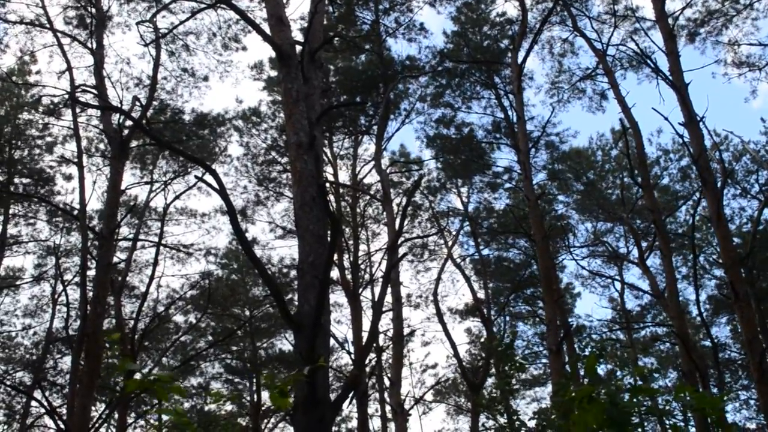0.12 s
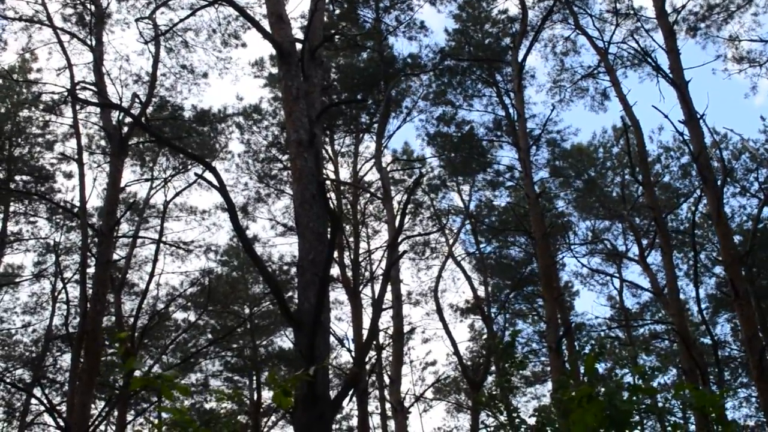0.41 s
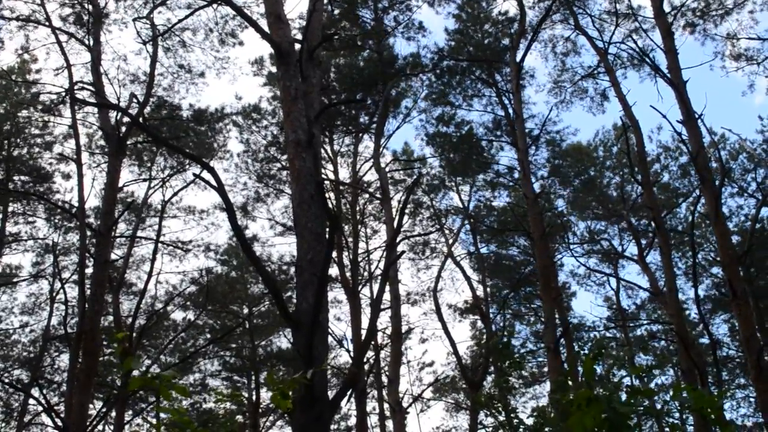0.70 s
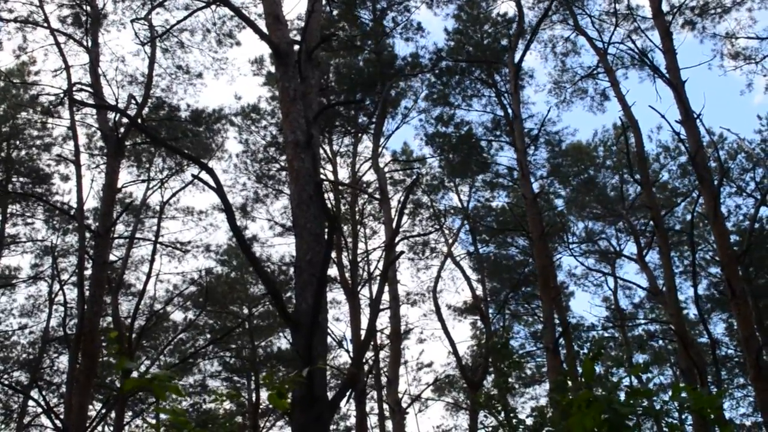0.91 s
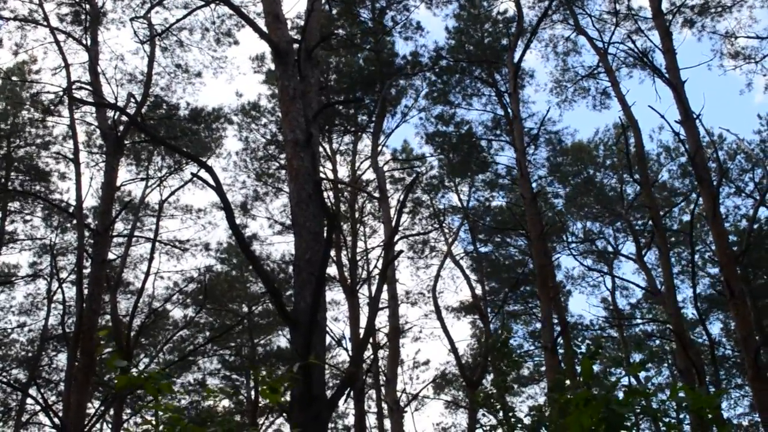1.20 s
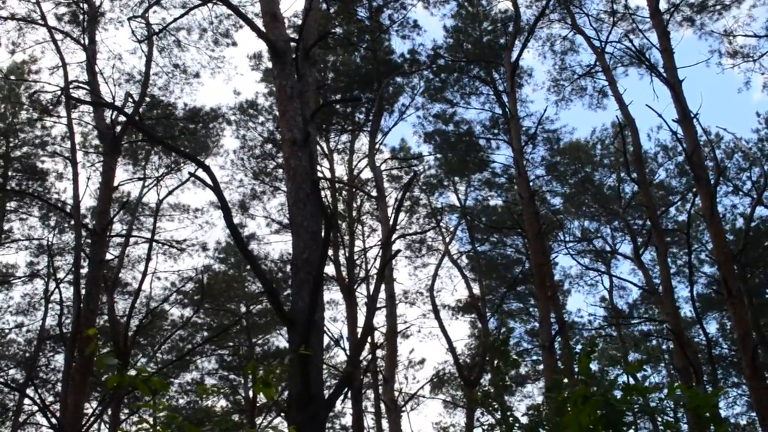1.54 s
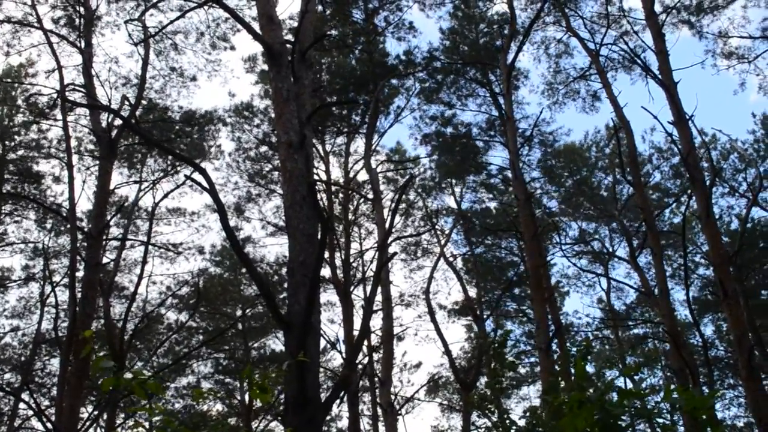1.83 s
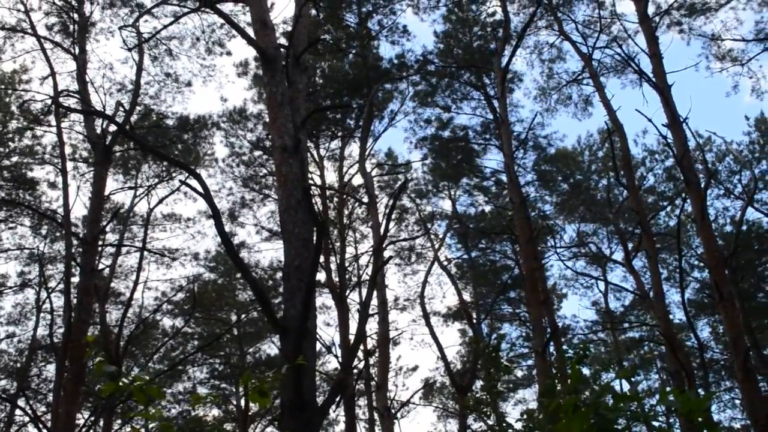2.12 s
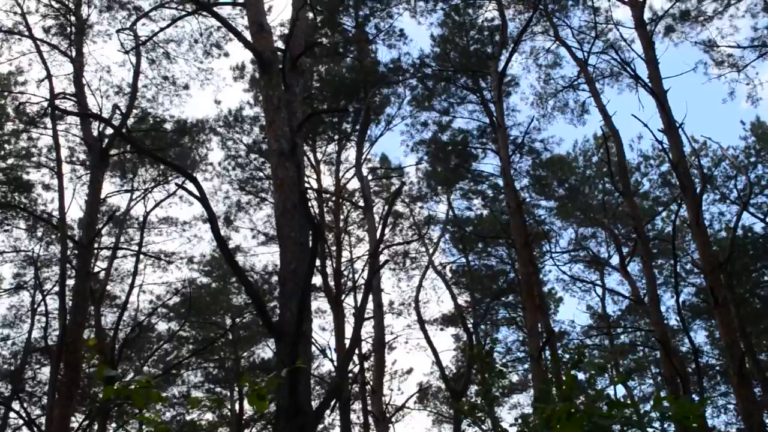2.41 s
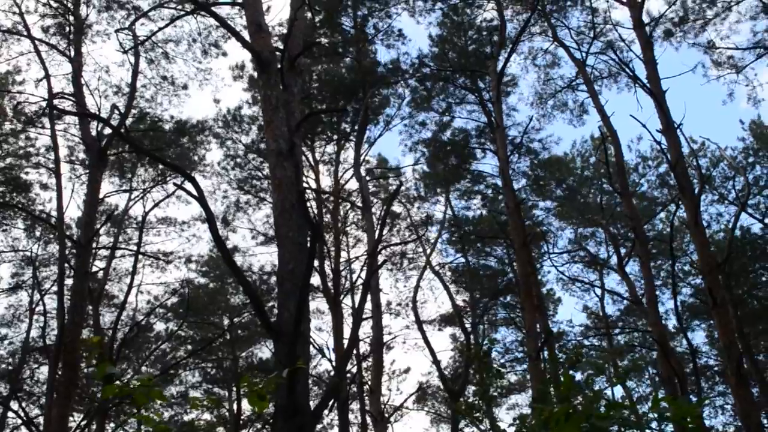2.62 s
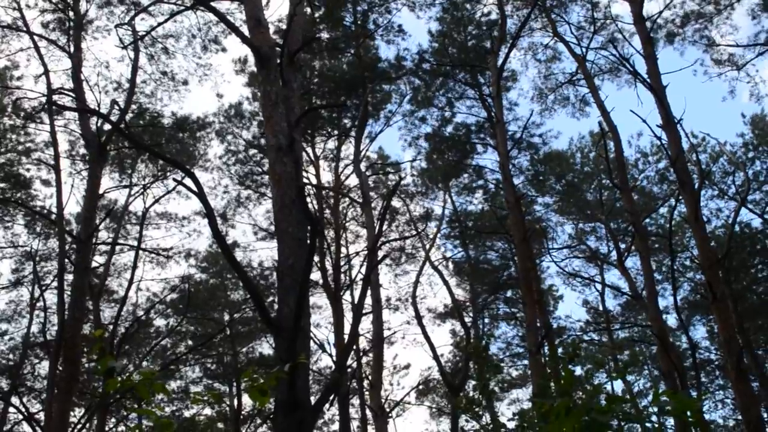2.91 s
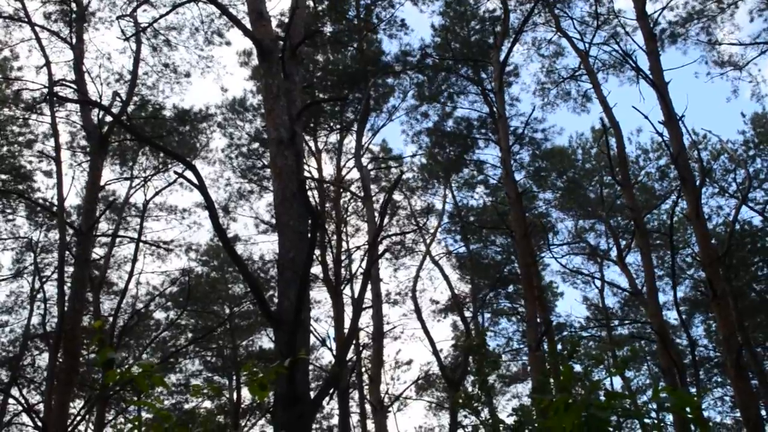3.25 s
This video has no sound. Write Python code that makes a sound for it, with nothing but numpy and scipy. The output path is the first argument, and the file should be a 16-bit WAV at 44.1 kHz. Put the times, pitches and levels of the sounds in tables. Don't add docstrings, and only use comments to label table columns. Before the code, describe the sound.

A small warbler sings close by in a pine forest. From 0.2 s, separate piercing upward whistles grow louder and closer together, becoming a fast, even trill from 1.7 to 3.1 s. A very distant thrush glides faintly until 1.5 s; a nearer one flutes softly from 2.4 s to the end. A woody twig tick at 1.8 s, a tiny leaf tick at 1.9 s. Soft air hum, early faint leaf hiss, short woodland haze.

```python
import sys
import numpy as np
from scipy import signal
from scipy.fft import rfft, irfft
from scipy.io import wavfile
from scipy.ndimage import uniform_filter1d

SR = 44100
rng = np.random.default_rng(int(sys.argv[2]) if len(sys.argv) > 2 else 0)


def put_to_file(sound):
    columns = np.atleast_2d(sound).T
    safe = np.clip(columns, -1, 1)
    whole_steps = np.round(safe * 32767)
    wavfile.write(sys.argv[1], SR, whole_steps.astype(np.int16))


def invert_db(x):
    u = np.asarray(x, float) / 20
    return 10 ** u


N = 149940

# (time of passing the anchor pitch [s], level [dB], top pitch [Hz])
OPENING_NOTES = [(0.1834, -34.5, 9060), (0.3755, -35, 8580), (0.5366, -32, 8320), (0.6912, -28, 7930),
                 (0.8409, -27, 7860), (0.9846, -27.5, 7850), (1.1263, -27, 7740), (1.2585, -26.5, 7730),
                 (1.3897, -24.5, 7760), (1.5239, -23, 7590), (1.6376, -25, 7530)]
# (time of passing the anchor pitch [s], level [dB], top pitch [Hz])
TRILL_NOTES = [(1.7149, -25, 7430), (1.7778, -24.8, 7460), (1.8381, -25.5, 7470), (1.899, -25, 7260),
               (1.9604, -24.5, 7230), (2.0212, -24.5, 7380), (2.0831, -24.5, 7470), (2.1434, -24.5, 7530),
               (2.2056, -25, 7440), (2.2677, -25, 7230), (2.3289, -26, 7210), (2.3907, -26, 7190),
               (2.4540, -24, 7280), (2.5181, -24.5, 7160), (2.5776, -24, 7270), (2.6404, -25, 7280),
               (2.7037, -25, 7350), (2.7669, -24.5, 7350), (2.8307, -24, 7350), (2.8947, -24.5, 7270),
               (2.9611, -26, 7160), (3.0261, -26.5, 7000), (3.0896, -26, 7130)]
ANCHOR_HZ = 5500

# (time from the anchor [s], pitch [Hz], level [dB], octave overtone level [dB])
FIRST_SHAPE = [(-.010, 2800, -33, -36), (-.006, 3250, -21, -25), (-.003, 4000, -17, -25),
               (0, 5500, -17, -28), (.007, 7200, -8, -60), (.017, 8100, -1, -70), (.030, 9050, -1, -70),
               (.036, 8800, -14, -70)]
LAST_SLOW_SHAPE = [(-.021, 1950, -45, -26), (-.011, 2850, -24, -18), (-.004, 4400, -14, -25),
                   (0, 5500, -9, -27), (.007, 6650, -4, -60), (.017, 7030, 0, -70), (.028, 7650, -5, -70),
                   (.039, 6900, -20, -70)]
BRIDGE_SHAPE = [(-.019, 1950, -45, -28), (-.011, 2700, -26, -19), (-.004, 4300, -15, -25),
                (0, 5500, -6, -27), (.005, 6250, -4, -60), (.012, 6900, 0, -70), (.021, 7500, -2, -70),
                (.032, 6300, -13, -70)]
TURNING_SHAPE = [(-.014, 3400, -34, -40), (-.009, 3800, -22, -32), (-.003, 4600, -13, -29),
                 (0, 5500, -8, -31), (.004, 6250, -4, -60), (.010, 6950, 0, -70), (.017, 7400, -1, -70),
                 (.024, 6700, -11, -70)]
EARLY_TRILL_SHAPE = [(-.012, 3700, -28, -52), (-.008, 4150, -16, -33), (-.004, 4850, -5, -32),
                     (0, 5500, -2, -40), (.006, 6350, -2, -60), (.011, 6950, 0, -70),
                     (.0165, 7400, -1, -70), (.026, 6500, -11, -70)]
LAST_SHAPE = [(-.019, 3650, -24, -50), (-.013, 4000, -14, -34), (-.0055, 4500, -7, -32), (0, 5500, 1, -38),
              (.005, 6150, -2, -60), (.010, 6750, -1, -70), (.0145, 7100, -3, -70), (.023, 6200, -14, -70)]
SHAPE_TIMES = [.18, 1.1, 1.638, 1.715, 1.8, 2.7]

# (time [s], pitch [Hz], level [dB])
THRUSH_NOTES = [
    [(2.435, 1600, -68), (2.456, 1800, -62), (2.468, 1930, -54), (2.482, 1975, -50), (2.497, 1980, -53),
     (2.512, 1980, -60)],
    [(2.515, 2450, -64), (2.528, 2640, -57), (2.545, 2640, -60), (2.59, 2630, -64)],
    [(2.538, 2590, -62), (2.552, 2530, -58), (2.572, 2480, -60)],
    [(2.786, 2420, -58), (2.797, 2300, -53), (2.812, 2080, -60)],
    [(2.825, 1520, -58), (2.834, 1660, -55), (2.847, 1820, -57), (2.885, 1865, -52), (2.915, 1930, -44),
     (2.955, 1945, -42), (2.973, 2010, -47)],
    [(3.158, 2640, -60), (3.175, 2580, -53), (3.195, 2490, -49), (3.215, 2450, -53), (3.24, 2410, -49),
     (3.258, 2370, -51), (3.275, 2330, -43), (3.31, 2280, -46), (3.345, 2280, -48), (3.365, 2290, -55)],
    [(3.364, 2850, -66), (3.376, 2380, -60), (3.392, 2010, -50), (3.405, 1880, -50)],
]
# (time [s], pitch [Hz], level [dB])
THRUSH_WARBLE = [
    (2.556, 2300, -60),
    (2.568, 2080, -55),
    (2.61, 2080, -55),
    (2.65, 2100, -52),
    (2.68, 2080, -53),
    (2.70, 2050, -66),
]
# (time [s], length [s], start pitch [Hz], end pitch [Hz], level [dB])
FAR_GLIDES = [(.15, .05, 2100, 2030, -70), (.41, .09, 2090, 2090, -72), (.50, .07, 2270, 2290, -74),
              (.60, .07, 2290, 2300, -73), (.66, .05, 2100, 2110, -69), (.70, .13, 2300, 2220, -74),
              (.66, .12, 2670, 2670, -74), (.835, .10, 1800, 1810, -67), (.90, .08, 2050, 2000, -74),
              (1.04, .1, 2090, 2030, -73), (1.27, .07, 2400, 2500, -68), (1.335, .11, 2510, 2490, -66),
              (1.41, .04, 2080, 2040, -69), (1.44, .08, 2450, 2130, -70)]

# (pitch [Hz], level [dB], time to fall by 60 dB [s])
TWIG_TONES = [
    (1350, 0, .018),
    (900, -8, .008),
    (2000, -4, .008),
    (2600, -5, .007),
    (3200, -3, .008),
]
# (time [s], pitch [Hz], level [dB], length [s])
LEAF_TICK = (1.9352, 9900, -51, .0005)
# (frequency [Hz], level [dB])
AIR_COLOUR = [(20, -21), (200, -9), (500, 1), (1000, -0.5), (2000, -9.5), (4000, -16.5), (6500, -26),
              (9500, -30.5)]


def add(out, start, x):
    out[start:start + len(x)] += x[:len(out) - start]


def soft_filter(x, order, hz, kind="low"):
    return signal.sosfilt(signal.butter(order, hz, kind, fs=SR, output="sos"), x)


def drift(length, step_s, smooth):
    knots = rng.standard_normal(1000)
    steps = np.arange(length) / SR / step_s
    return uniform_filter1d(np.interp(steps, np.arange(1000), knots), size=smooth)


def whistle(rows, wobble_hz=0, dip_db=0):
    wobbles_per_s, slip = 52, 0.03
    s, *columns = np.transpose(rows)
    start = int(s[0] * SR)
    t = np.arange(start, int(s[-1] * SR)) / SR
    curves = [np.interp(t, s, column) for column in columns]
    hz, *levels = [uniform_filter1d(curve, size=60, mode="nearest") for curve in curves]

    wobble_phase = 2 * np.pi * wobbles_per_s * (t - t[0])
    if wobble_hz:
        wobble_phase = wobble_phase + slip * np.cumsum(rng.standard_normal(len(t)))
    swing = np.cos(wobble_phase)
    phase = 2 * np.pi * np.cumsum(hz + wobble_hz * swing) / SR
    fade = np.minimum(1, np.minimum(t - t[0], t[-1] - t) / 0.0012)
    return start, phase, [fade * invert_db(level - dip_db * swing) for level in levels]


def forest(x, wet_db, slow=1, scatter=2.2, thin_hz=20):
    near_t60_s, far_t60_s, late_db = 0.24, 0.59, -6
    t = np.arange(SR) / SR
    echo_size = invert_db(scatter * np.minimum(rng.exponential(1, SR), 5))
    echoes = soft_filter(rng.standard_normal(SR) * echo_size, 1, 9000)
    echoes = soft_filter(echoes, 1, thin_hz, "high")
    dull = soft_filter(echoes, 1, 5260)

    quick_haze = echoes * invert_db(-60 * t / near_t60_s / slow)
    slow_haze = dull * invert_db(late_db - 60 * t / far_t60_s)
    haze = (quick_haze + slow_haze) * np.minimum(1, t / 0.0047)
    haze = haze / np.sqrt(np.sum(haze ** 2))
    return x + invert_db(wet_db) * signal.fftconvolve(x, haze)[:N]


def shimmer(x):
    return x * invert_db(2.6 * drift(N, step_s=0.010, smooth=300) - 1.5)


def air():
    hum_db, leaf_db, leaf_hz, leaf_until_s = -56.5, -72.5, 4380, 0.32
    t = np.arange(N) / SR
    hz = np.maximum(np.arange(N // 2 + 1) * SR / N, 10)
    colour_hz, colour_db = np.transpose(AIR_COLOUR)
    colour = invert_db(np.interp(np.log(hz), np.log(colour_hz), colour_db))
    hum = irfft(rfft(rng.standard_normal(N)) * colour, N)
    hiss = soft_filter(rng.standard_normal(N), 2, [leaf_hz - 180, leaf_hz + 180], "band")
    hiss_fade = 1 / (1 + (t / leaf_until_s) ** 2)
    return invert_db(hum_db) * hum / hum.std() + invert_db(leaf_db) * hiss / hiss.std() * hiss_fade


def tick():
    s, hz, db, length = LEAF_TICK
    t = np.arange(N) / SR - s
    return invert_db(db) * np.exp(-(t / length) ** 2) * np.sin(2 * np.pi * hz * t)


def twig():
    twig_s, twig_db = 1.7856, -44.5
    t, out = np.arange(2000) / SR, np.zeros(N)
    ring = np.zeros(len(t))
    for hz, db, t60 in TWIG_TONES:
        ring += invert_db(db - 60 * t / t60) * np.sin(2 * np.pi * hz * t)
    for lag_s, db in [(0, 2), (.0011, -11), (.0027, 3.5), (.004, -12)]:
        add(out, int((twig_s + lag_s) * SR), invert_db(twig_db + db) * ring)
    return forest(soft_filter(out, 2, 700, "high"), wet_db=-26.5)


def far_thrush():
    out = np.zeros(N)
    for s, length, start_hz, end_hz, db in FAR_GLIDES:
        glide = [(s, start_hz, db + 4), (s + 0.1 * length, start_hz, db), (s + length, end_hz, db + 3)]
        start, phase, (loudness,) = whistle(glide, wobble_hz=25)
        add(out, start, loudness * np.sin(phase))
    return shimmer(forest(out, wet_db=-3, slow=1.1, scatter=0))


def thrush():
    out = np.zeros(N)
    notes = [whistle(rows) for rows in THRUSH_NOTES]
    notes.append(whistle(THRUSH_WARBLE, wobble_hz=190, dip_db=5))
    for start, phase, (loudness,) in notes:
        add(out, start, loudness * np.sin(phase))
    return invert_db(2.5) * shimmer(forest(out, wet_db=-9, slow=2.4, scatter=0))


def warbler_shape(s, db, top_hz):
    shapes = np.array([FIRST_SHAPE, LAST_SLOW_SHAPE, BRIDGE_SHAPE,
                       TURNING_SHAPE, EARLY_TRILL_SHAPE, LAST_SHAPE], float)
    place = np.interp(s, SHAPE_TIMES, np.arange(len(shapes)))
    k = min(int(place), len(shapes) - 2)
    blend = shapes[k] + (place - k) * (shapes[k + 1] - shapes[k])
    dt, hz, level, overtone = blend.T
    stretch = (top_hz - ANCHOR_HZ) / (hz.max() - ANCHOR_HZ)
    hz = np.where(hz > ANCHOR_HZ, ANCHOR_HZ + (hz - ANCHOR_HZ) * stretch, hz)
    return np.transpose([s + dt, hz, db + level, db + overtone])


def warbler_note(rows, overtone_db):
    held = np.insert(rows, -1, rows[-2] + [.002, -90, -3, 0], axis=0)
    start, phase, (body, octave) = whistle(held)
    body = body * invert_db(1.2 * drift(len(body), step_s=.002, smooth=80))
    octave = octave * invert_db(1.2 * rng.standard_normal() + 1.0 + overtone_db)
    hz = np.gradient(phase) * SR / (2 * np.pi)
    third = octave * invert_db(-13) * (hz < 3700)
    return start, body * np.sin(phase), octave * np.sin(2 * phase) + third * np.sin(3 * phase)


def warbler_whisper(s, top_s, db, top_hz):
    t0, hz, length_s = top_s + 0.00081, top_hz + 1600, .007
    level = db - 18 - 10 * s
    rows = [(t0 - .002, hz, level - 9.5), (t0 + 0.00028, hz, level), (t0 + length_s, hz - 1350, level + 2)]
    if s == OPENING_NOTES[0][0]:
        rows.append((t0 + length_s + .012, 4900, level - 12))
    start, phase, (loudness,) = whistle(rows)
    return start, loudness * np.sin(phase)


def warbler():
    out, thin = np.zeros((2, N))
    for s, db, top_hz in list(OPENING_NOTES) + list(TRILL_NOTES):
        rows = warbler_shape(s, db, top_hz)
        overtone_db = -1 if s < SHAPE_TIMES[3] else -2.5
        start, body, overtones = warbler_note(rows, overtone_db)
        add(out, start, body)
        add(thin, start, overtones)
        if s < SHAPE_TIMES[2] - .1:
            add(thin, *warbler_whisper(s, rows[-2, 0], db, top_hz))
    return forest(out, wet_db=-11, thin_hz=5000) + forest(thin, wet_db=-5, thin_hz=5000)


def scene():
    return (air() + tick() + twig() + far_thrush() + thrush() + warbler())[None]


def low_pass(x):
    return signal.sosfilt(signal.butter(12, 11640, fs=SR, output="sos"), x)


def record(dry):
    x = soft_filter(dry, 8, 9640)
    x = soft_filter(x, 1, 26, "high")
    return low_pass(x)


dry = scene()
out = record(dry)
put_to_file(out)
```